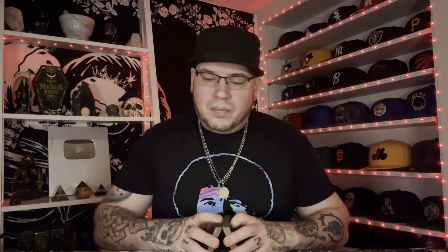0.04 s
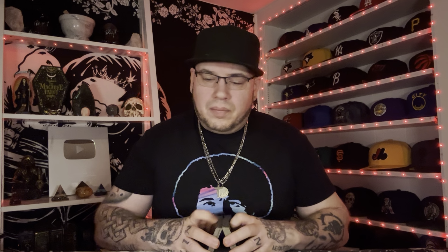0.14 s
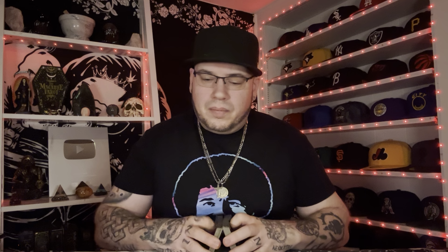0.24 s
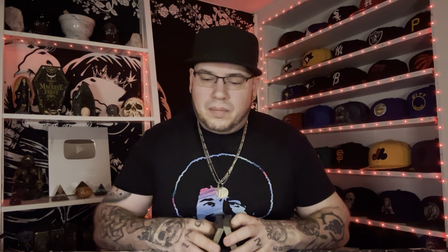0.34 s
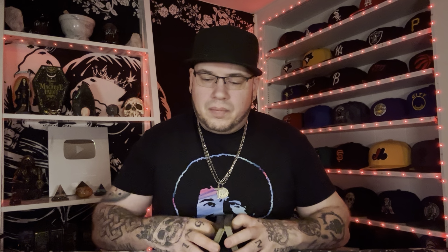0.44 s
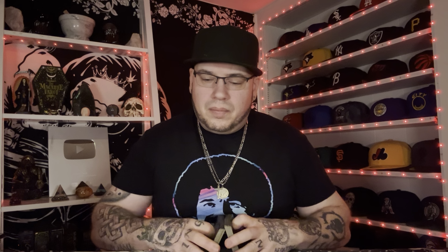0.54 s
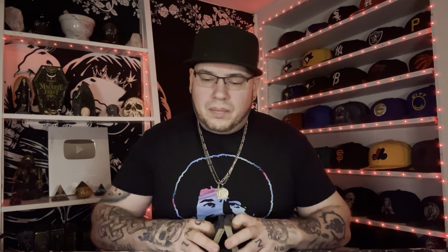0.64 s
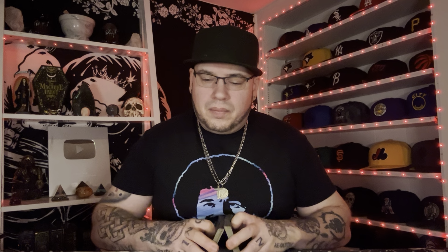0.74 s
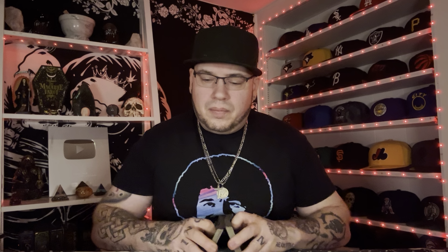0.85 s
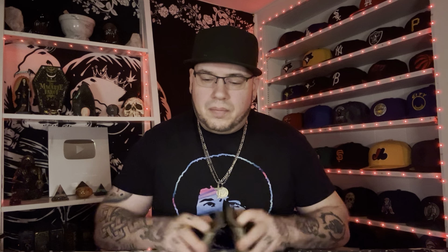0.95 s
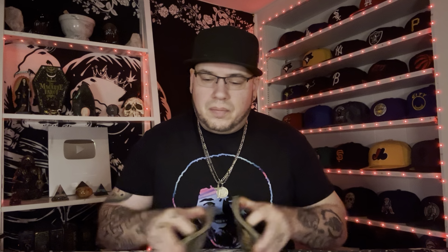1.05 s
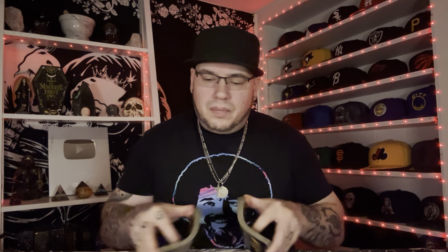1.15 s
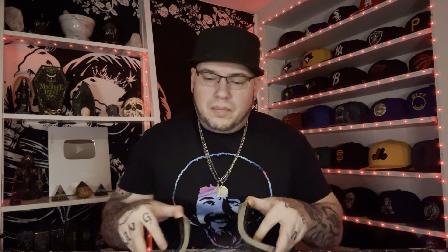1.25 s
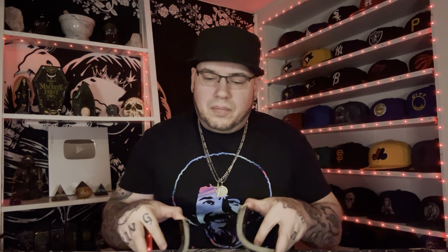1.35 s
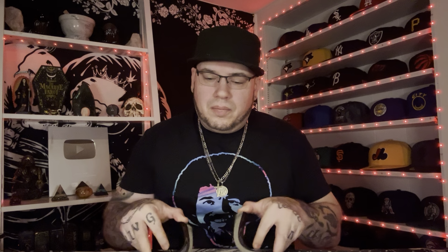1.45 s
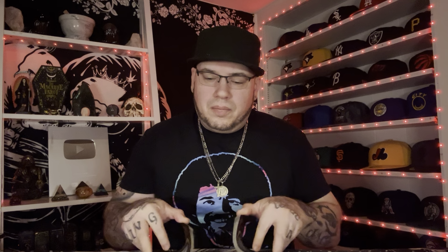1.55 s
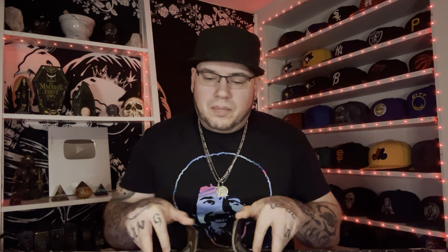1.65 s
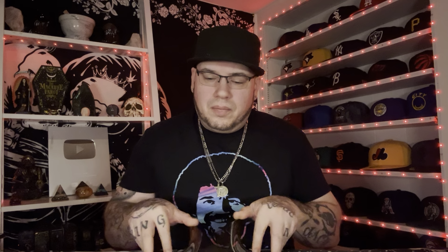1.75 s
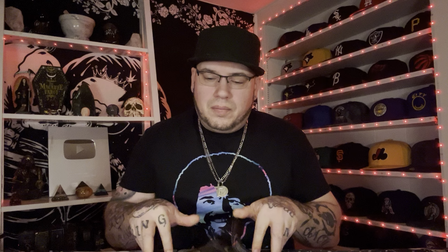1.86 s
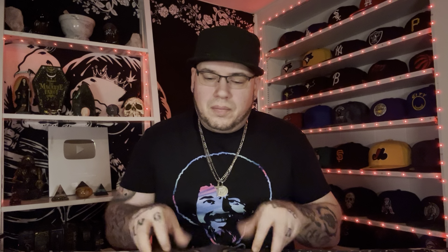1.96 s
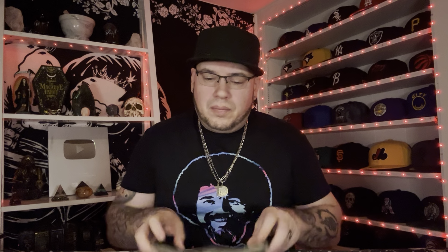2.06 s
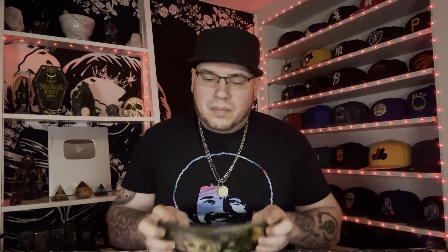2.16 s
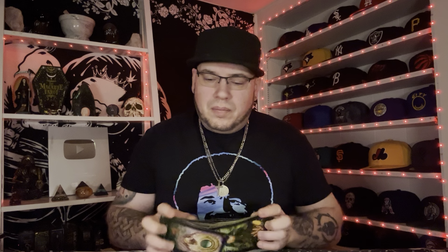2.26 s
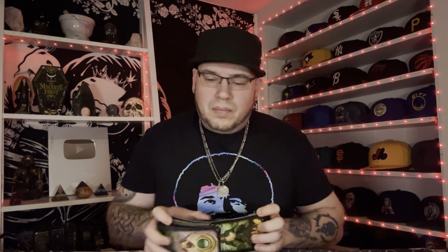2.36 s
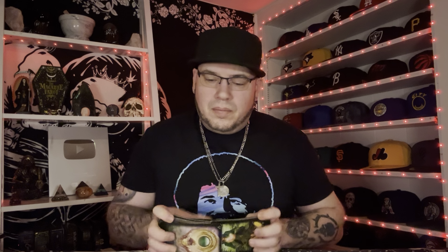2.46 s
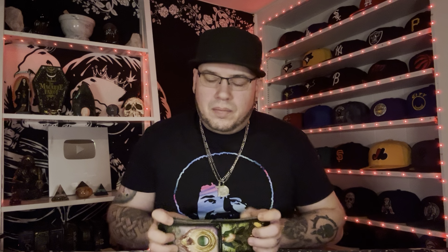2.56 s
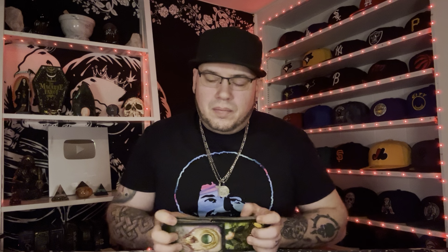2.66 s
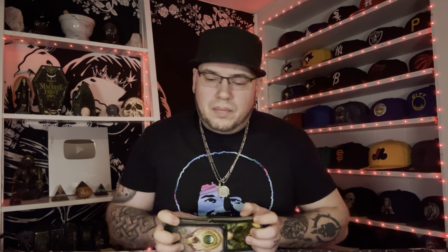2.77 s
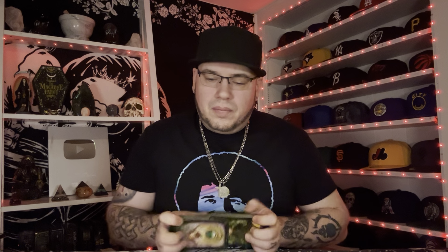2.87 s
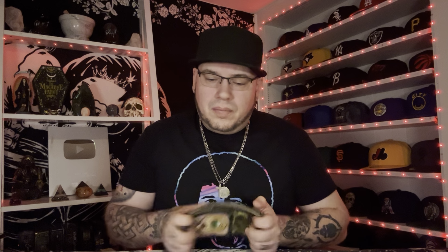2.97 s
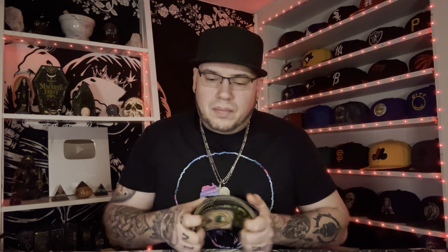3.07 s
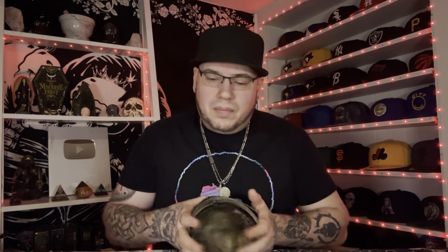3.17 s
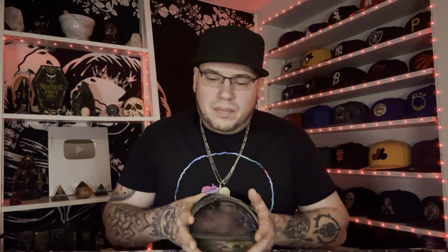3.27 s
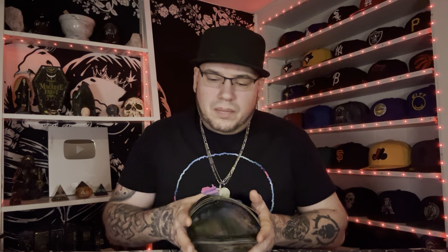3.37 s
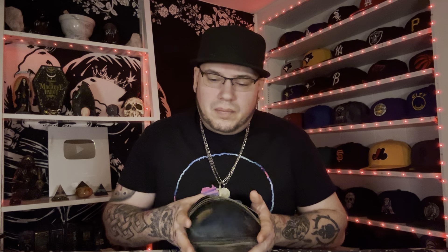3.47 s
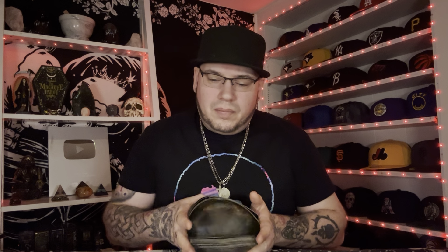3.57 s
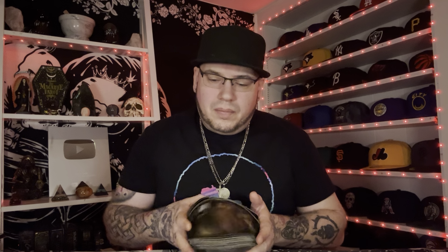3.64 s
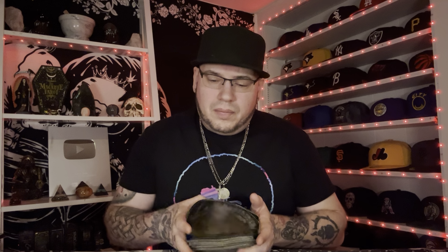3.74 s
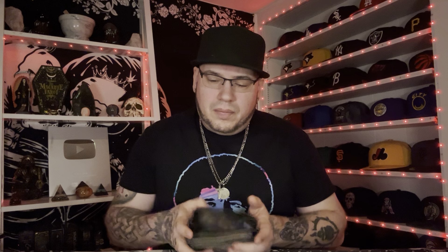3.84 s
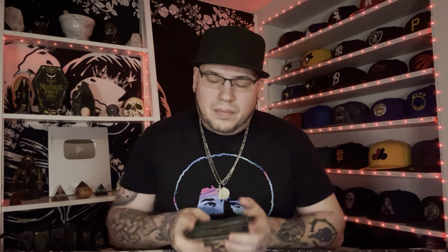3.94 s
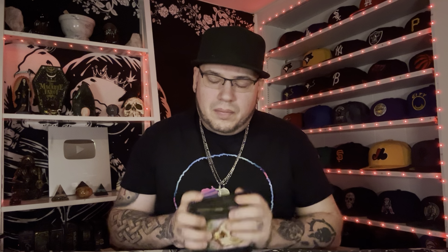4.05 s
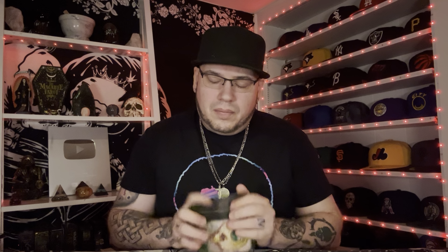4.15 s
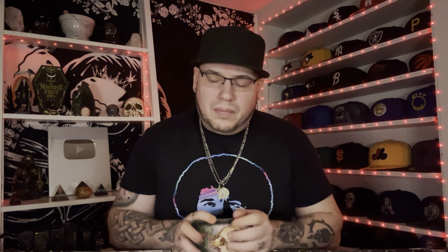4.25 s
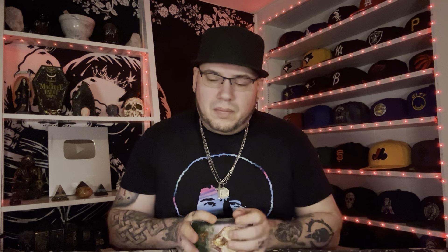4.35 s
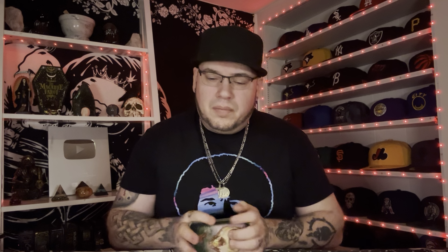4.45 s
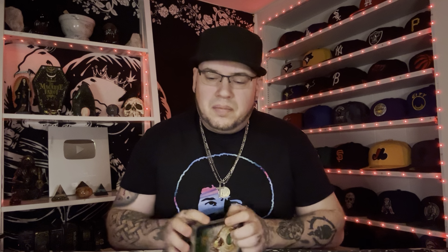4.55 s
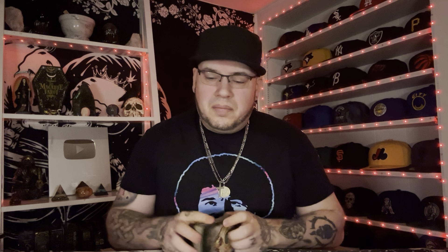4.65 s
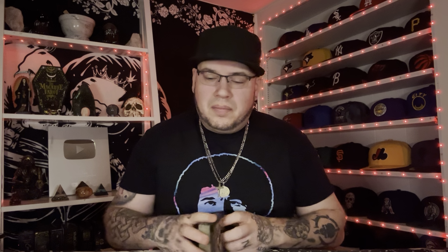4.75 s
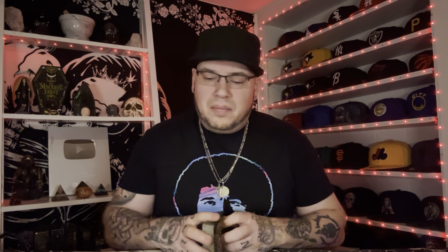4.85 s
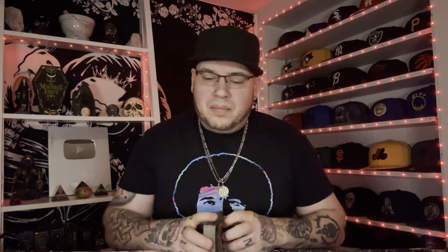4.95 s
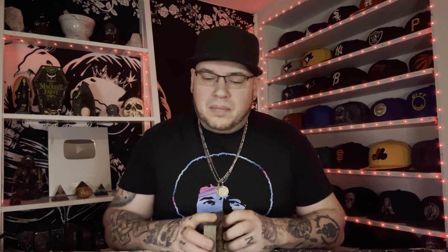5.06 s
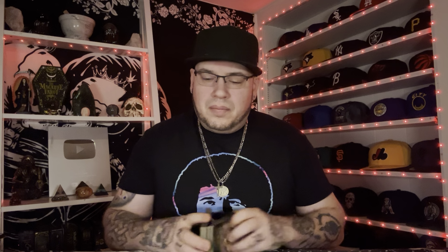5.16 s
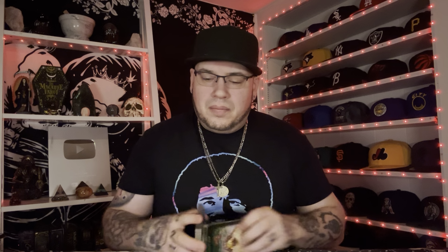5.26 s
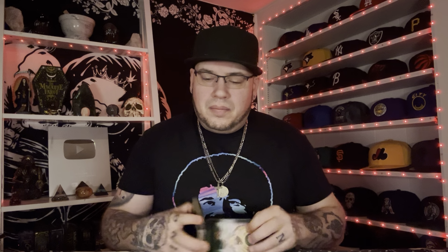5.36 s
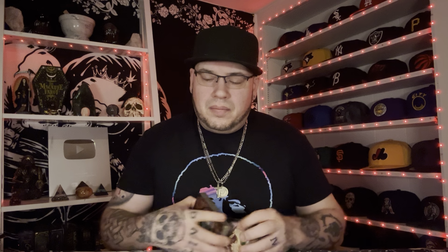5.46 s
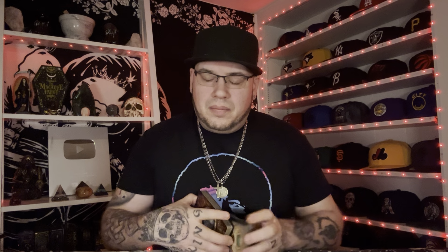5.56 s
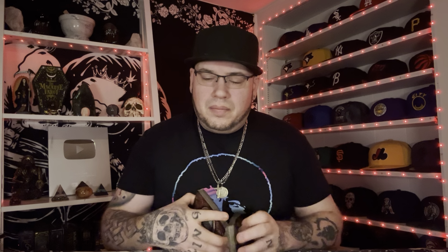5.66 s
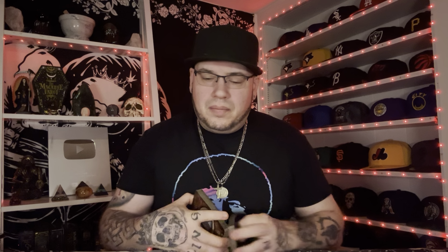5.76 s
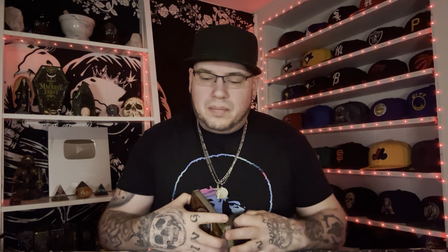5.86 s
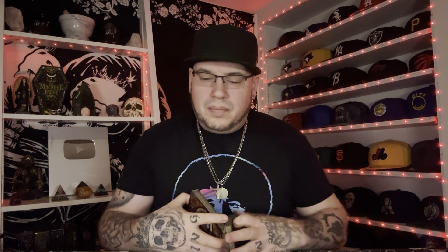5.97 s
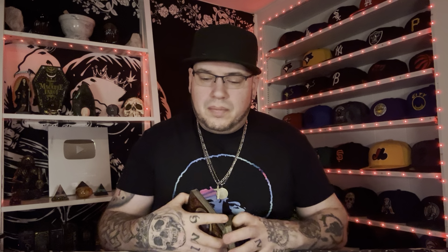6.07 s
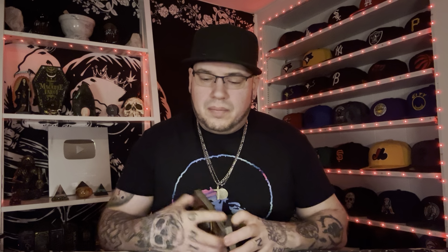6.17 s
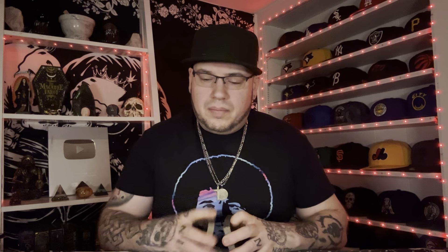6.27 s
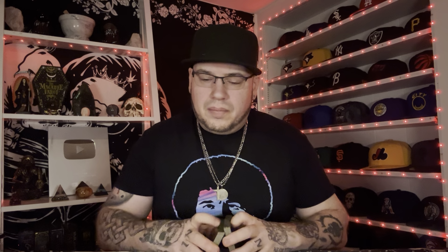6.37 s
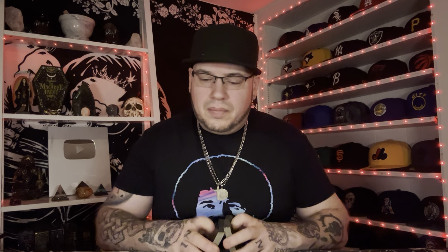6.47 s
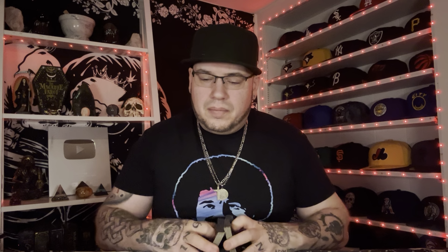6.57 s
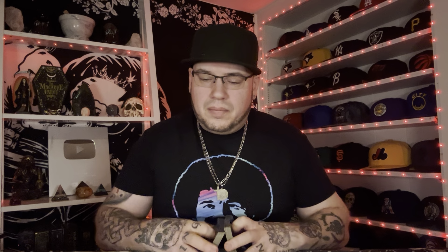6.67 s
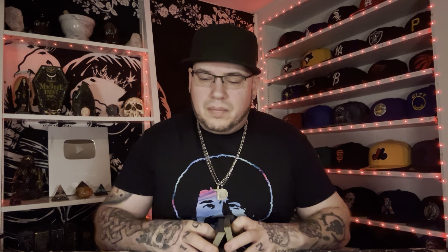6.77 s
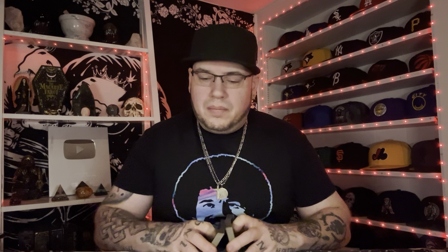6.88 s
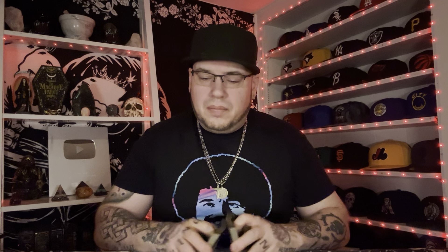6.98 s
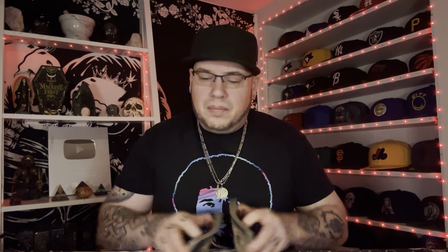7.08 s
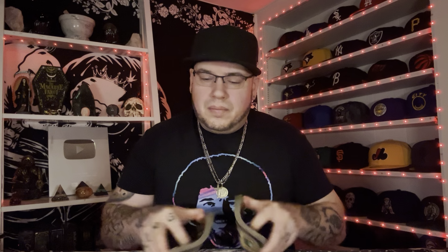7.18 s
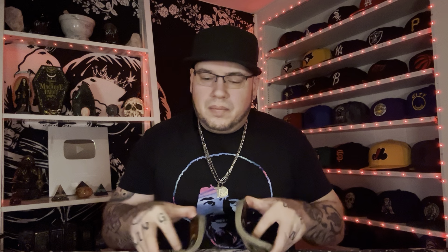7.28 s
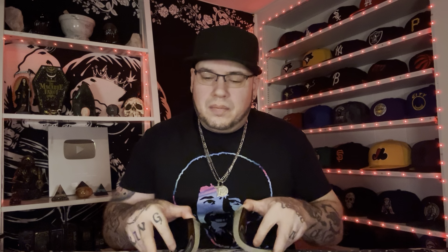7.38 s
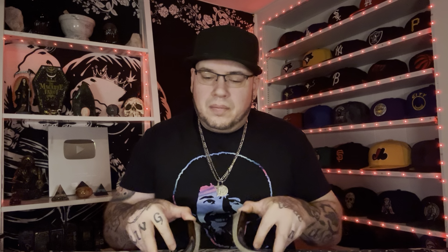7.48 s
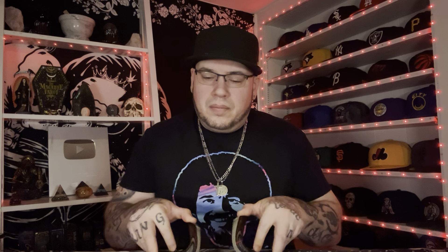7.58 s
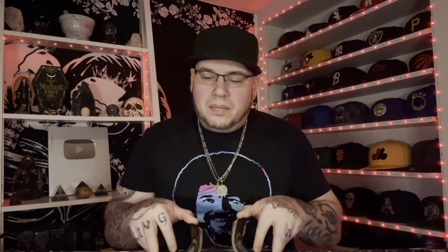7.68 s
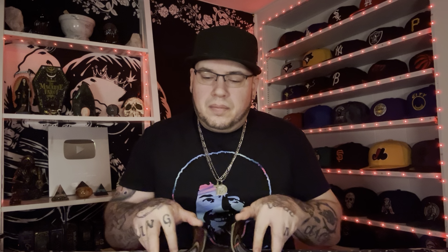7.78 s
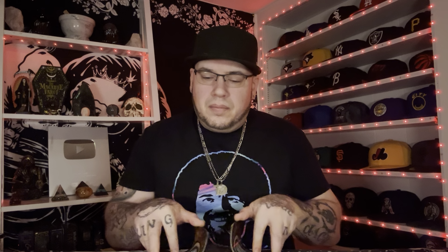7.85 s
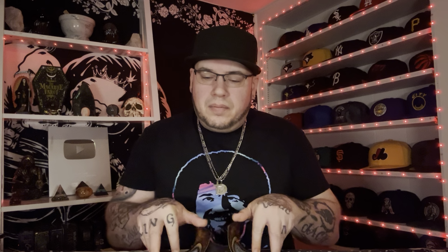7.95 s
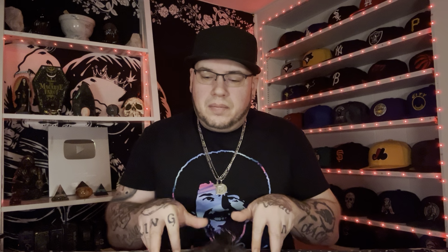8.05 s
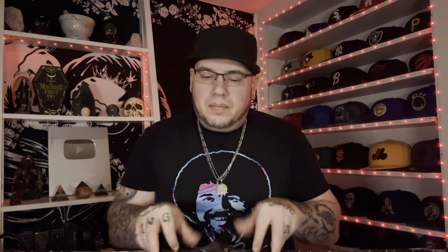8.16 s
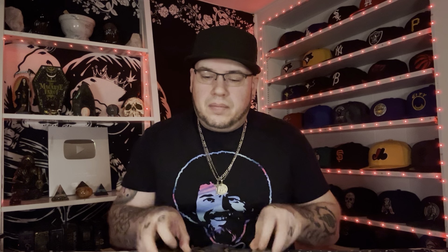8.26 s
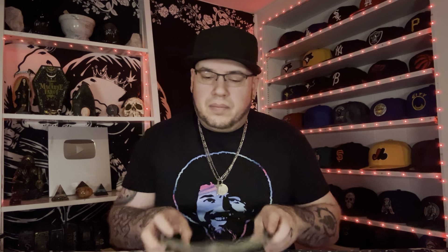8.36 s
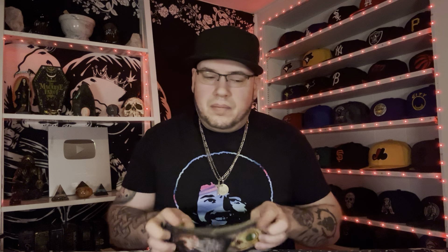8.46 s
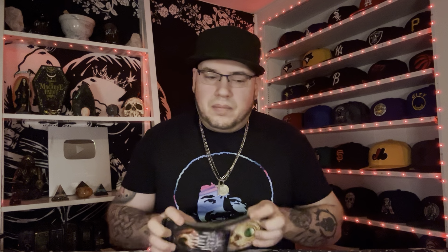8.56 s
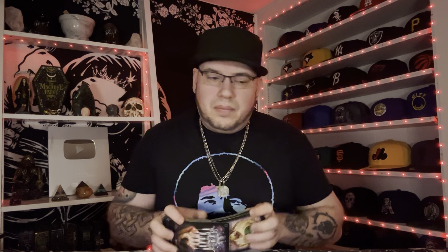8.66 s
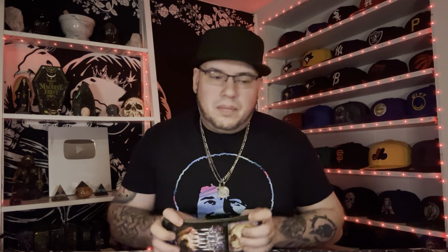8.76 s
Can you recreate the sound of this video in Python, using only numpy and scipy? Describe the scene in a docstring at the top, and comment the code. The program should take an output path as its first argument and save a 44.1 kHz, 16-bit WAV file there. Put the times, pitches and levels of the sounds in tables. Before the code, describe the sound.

Two brisk, snappy riffle shuffles of a big card deck, with a lighter cascade, squaring knocks and faint finger rubbing in a quiet humming room.

```python
"""A deck of large cards on a table: fingers rustle over it, then a first riffle shuffle, a bridge cascade,
knocks as the deck is squared up, more handling, and a second riffle.
Each clear card ticks at its edge, slaps the pile and pops the air pocket below, all from shaped noise and
short swings; bent pulses make the sharpest cracks, and many small puffs of noise make the flaps between.
Throughout, a small furnished room with a mains hum is heard by two microphone ports close together."""
import sys
import numpy as np
from scipy import signal
from scipy.fft import rfft, irfft, next_fast_len
from scipy.io import wavfile
from scipy.ndimage import uniform_filter1d

SR = 44100
rng = np.random.default_rng(int(sys.argv[2]) if len(sys.argv) > 2 else 0)


def wav_record(signal):
    """Record a signal, one row per channel, as 16-bit PCM in the file named by sys.argv[1]."""
    frames = np.transpose(np.atleast_2d(signal))
    bounded = np.clip(frames, -1, 1)
    # unit amplitude maps onto the largest positive 16-bit level
    quanta = np.round(bounded * 32767).astype(np.int16)
    wavfile.write(sys.argv[1], SR, quanta)


N = 388962   # length [samples]

# the clear cards: (time [s], edge tick level [dB], slap level [dB], air pop level [dB], pop pitch [Hz])
CARD_FALLS = [(1.1876, -23, -12.5, -15, 800), (1.251, -20.5, -32, -28, 596), (1.2584, -45, -18, -14, 445),
              (1.263, -41.5, -10, -11, 1040), (1.2678, -32, -13, -33, 1200), (1.2819, -51, -20, -20, 850),
              (1.3004, -26, -35, -17, 940), (1.312, -36, -31, -21.5, 810), (1.37, -16, -10, -22, 900),
              (1.393, -41, -23, -20, 900), (1.4047, -42, -20, -17.5, 624), (1.4265, -16, -10, -20.5, 1090),
              (1.4539, -18, -7.5, -15, 1190), (1.4755, -23.5, -13.5, -39, 1270),
              (1.498, -18.5, -11, -24, 800), (1.51, -38.5, -23, -19, 565), (1.5238, -13, -6, -14.5, 830),
              (1.537, -19.5, -11.5, -27.5, 307), (1.5725, -34, -18, -21, 720),
              (1.5878, -14.5, -6.5, -17, 476), (1.609, -8, -1.5, -15.5, 580),
              (1.625, -38.5, -9.5, -18, 766), (1.6445, -13, -9, -16, 965), (1.652, -8.5, -28, -37, 800),
              (1.6765, -31.5, -10, -18, 570), (1.7113, -9, -16, -36, 1040), (1.7223, -38.5, -9, -14, 900),
              (1.762, -26, -13.5, -38, 1170), (1.785, -13.5, -19, -30, 790), (1.788, -11, -6.5, -14, 574),
              (1.8145, -47, -25, -39, 770), (1.829, -11, -4, -23, 990), (1.8729, -24, -22, -21.5, 580),
              (3.0955, -31, -31, -31, 615), (3.1617, -26, -48, -53, 1230), (3.175, -29, -33, -25, 715),
              (3.2, -23, -45, -26, 1240), (3.2274, -18, -30, -16, 574), (3.2624, -40, -28.5, -27, 1000),
              (3.276, -24.5, -35, -54, 447), (3.324, -22, -49, -27, 720), (3.34, -27.5, -51, -32, 700),
              (3.375, -31, -30, -30, 596), (3.3903, -21.5, -49, -40, 700), (3.42, -15.5, -48, -33, 1070),
              (3.4539, -21, -22, -26, 380), (3.478, -15, -32, -9.5, 940), (3.5138, -13.5, -8, -4.5, 746),
              (3.5256, -15.5, -20, -16, 573), (3.5561, -22, -18, -17.5, 540), (3.5726, -23, -21, -21, 596),
              (3.599, -29, -37, -30, 900), (3.619, -26, -30, -34, 900), (3.6345, -37, -19, -26, 1970),
              (3.672, -23.5, -25, -36, 1245), (3.716, -25, -20.5, -48, 900), (3.682, -28.5, -40, -42, 900),
              (3.738, -19.5, -21, -23, 960), (3.785, -23, -17, -23.5, 507), (3.8004, -20.5, -37, -42, 800),
              (3.81, -23, -40, -30, 1270), (3.8492, -40.5, -35, -28, 900), (3.861, -27, -15, -30, 640),
              (3.872, -40, -19, -36, 700), (3.946, -52, -40, -27, 1700), (7.225, -39.5, -17, -19.5, 763),
              (7.2748, -42.5, -34, -28, 790), (7.28, -51, -40, -20, 533), (7.2969, -51, -23.5, -24, 610),
              (7.3181, -16, -16, -18.5, 420), (7.348, -31.5, -20.5, -19.5, 900),
              (7.3508, -11.5, -5, -28.5, 410), (7.369, -36, -25.5, -12, 600),
              (7.3795, -19, -21.5, -34.5, 597), (7.4271, -8.5, -14, -37, 1300),
              (7.4425, -22.5, -27, -28.5, 397), (7.4694, -13.5, -19, -19, 636),
              (7.4885, -15.5, -17, -45, 558), (7.501, -6.5, -6.5, -15.5, 690), (7.507, -9.5, -17, -31, 900),
              (7.5445, -13.5, -19.5, -25, 1110), (7.5581, -14.5, -25, -21.5, 1130),
              (7.579, -9.5, -21, -20.5, 696), (7.612, -31, -18.5, -23, 900), (7.6167, -8, -5, -24.5, 770),
              (7.623, -17, -15, -34, 900), (7.676, -45, -22, -21, 597), (7.681, -17, -20, -15, 720),
              (7.7131, -37.5, -17.5, -25.5, 308), (7.7235, -17, 0.5, -15.5, 1120),
              (7.7295, -10.5, -21, -31.5, 815), (7.748, -11.5, -9.5, -18.5, 900),
              (7.7754, -40, -43, -58, 800), (7.7977, -16, -13.5, -26.5, 900),
              (7.8006, -12.5, -1.5, -9, 643), (7.813, -18, -37, -43.5, 567),
              (7.85, -40.5, -29.5, -18.5, 765), (7.86, -14, -10.5, -30.5, 1010),
              (7.8802, -31, -25, -17, 520), (7.893, -23.5, -14.5, -30.5, 930),
              (7.896, -17, -9.5, -20.5, 900), (7.924, -17.5, -10.5, -21, 654),
              (7.9455, -17.5, -13.5, -20, 675), (7.949, -19, -17, -26, 900), (7.9555, -10, -32, -43, 700),
              (8.007, -17, -13, -12.5, 736), (8.0275, -20.5, -20.5, -41.5, 700), (8.0369, -6, -8, -41, 880),
              (8.0581, -9.5, -4, -15, 860)]
# tone colour of card edges: (frequency [Hz], level [dB])
EDGE_COLOUR = [(2060, -9), (3500, -5), (5860, -1), (8890, -4), (10100, -7), (11700, -8), (14100, -9.5),
               (15600, -16.5), (16200, -25.5), (17000, -51)]


def from_db(db):
    """Turn decibels into gain."""
    return 10 ** (np.asarray(db) / 20)


def rms_one(x):
    """Scale to an rms (average strength) of 1."""
    return x / np.sqrt(np.mean(x ** 2) + 1e-20)


def in_time(stretches):
    """Turn the level columns of several stretches into curves, silent between them."""
    rows = []
    for stretch in stretches:
        first, last = stretch[0], stretch[-1]
        silence = [-110] * len(first[1:])
        rows += [(first[0] - .03, *silence), *stretch, (last[0] + .03, *silence)]
    s, *columns = np.transpose(rows)
    return [np.interp(np.arange(N) / SR, s, column) for column in columns]


def at_hz(points, hz):
    """Read a table between its points on a log-frequency axis."""
    points = np.array(points)
    return np.interp(np.log(hz + 1), np.log(points[:, 0] + 1), points[:, 1])


def coloured(x, spectrum):
    """Give a sound the tone colour of a table; the minimum-phase filter has unit power and no pre-echo."""
    log_gain = np.log(from_db(at_hz(spectrum, np.linspace(0, SR / 2, 1025))))
    cepstrum = irfft(log_gain)
    # folding the cepstrum forward puts the energy as early as possible
    cepstrum[1:1024] *= 2
    cepstrum[1025:] = 0
    pulse = irfft(np.exp(rfft(cepstrum)))
    pulse = pulse / np.linalg.norm(pulse)
    return signal.oaconvolve(x, pulse[None], axes=-1)[:, :N]


def resonance(x, hz, width_hz):
    """Let a sound ring at one pitch: a two-pole peak with gain 1 on top."""
    r = np.exp(-np.pi * width_hz / SR)
    top = (1 - r * r) / 2
    return signal.lfilter([top, 0, -top], [1, -2 * r * np.cos(2 * np.pi * hz / SR), r * r], x + 1e-18)


def drift(rate):
    """Wander slowly and randomly around 0 with a spread of 1, faster for a higher rate."""
    r = np.exp(-80 * np.pi * rate / SR)   # computed at every 40th sample
    slow = signal.lfilter([1], [1, -2 * r, r * r], rng.standard_normal(N // 40 + 2002))[2000:]
    return np.interp(np.arange(N) / 40, np.arange(len(slow)), rms_one(slow))


def noise(alike):
    """Make two channels of white noise that share a part: 0 is none, 1 is all."""
    mid, side = rng.standard_normal((2, N))
    alike = np.clip(alike, 0, 1)
    return np.sqrt((1 + alike) / 2) * mid + np.sqrt((1 - alike) / 2) * side * [[1], [-1]]


def burst(envelope):
    """Make uneven, spiky noise of many small contacts, with the energy of its envelope."""
    spikes = from_db(5.3 * rng.standard_normal(len(envelope)))
    grit = envelope * rng.standard_normal(len(envelope)) * spikes
    return grit * np.linalg.norm(envelope) / np.linalg.norm(grit)


def grains(per_s, spread_db, ms, alike):
    """Scatter random contacts over the deck, each a short puff of noise that dies away; rms 1."""
    sizes = from_db(spread_db * np.minimum(rng.exponential(1, N), 4))
    contacts = sizes * (rng.random(N) < per_s / SR)
    r = np.exp(-1000 / (ms * SR))
    return rms_one(signal.lfilter([1], [1, -r], contacts) * noise(alike))


def strokes_db(rows, rise, fall):
    """Follow the loudest stroke (start [s], length [s], level [dB]); rise and fall are in dB per second."""
    t = np.arange(0, N + 64, 64) / SR
    strokes = []
    for s, length, db in rows:
        before, after = np.maximum(s - t, 0), np.maximum(t - s - length, 0)
        strokes.append(db - rise * before - fall * after)
    level_db = np.maximum(np.max(strokes, axis=0), -110)
    return np.interp(np.arange(N) / SR, t, level_db)


def room_air():
    """The air of the room: steady noise, strongest in the bass, whose level wavers a little."""
    # tone colour of the room's air: (frequency [Hz], level [dB])
    air_colour = [(76, -24), (130, -10.5), (149, -12.5), (178, -16.5), (243, -19.5), (339, -23), (446, -27),
                  (728, -33.5), (1390, -34.5), (5260, -63.5), (9650, -56), (12400, -60), (14000, -88.5)]
    return from_db(-56 + 1.0 * drift(7.3)) * coloured(noise(0.33), air_colour)


def hum():
    """Twice and four times the mains frequency and some faint tones above, all wavering a little."""
    # steady tones of the hum: (frequency [Hz], level [dB])
    hum_tones = [(120, -41.5), (240, -66.5), (451, -74.5), (580, -77), (797, -79.5), (845, -78)]
    t = np.arange(N) / SR
    total = 0
    for hz, db in hum_tones:
        level = from_db(db + 0.41 * drift(11.0)) * np.sqrt(2)   # rms to peak
        wobble = 0.13 * np.sqrt(hz / 120) * drift(0.83)
        total = total + level * np.sin(2 * np.pi * hz * t + wobble)
    return total * from_db([[1.5], [-1.5]])   # stronger on the left


def table_top():
    """Low noise rings in the bending mode of the table top as the deck or a forearm pushes it."""
    # pushes on the table top: (time [s], level [dB])
    pushes = [(1.27, -39), (1.54, -38.5), (1.68, -36), (1.8, -32), (1.88, -30.5), (2.27, -52), (2.39, -49),
              (2.81, -57.5), (3.21, -54), (3.56, -55), (3.89, -51), (4.238, -45), (5.32, -55.5),
              (6.31, -47), (7.249, -47), (7.51, -40), (7.7, -42), (7.91, -34), (8.1, -41), (8.81, -62)]
    rise_db_per_s, fall_db_per_s = 96.5, 168.5
    rest_db, wander_db = -56.5, 1   # it never quite rests
    pushed_db = strokes_db([(s, 0, db) for s, db in pushes], rise_db_per_s, fall_db_per_s)
    resting_db = rest_db + wander_db * drift(1.1)
    shake = resonance(noise(1.0), 64, 34)
    shake = resonance(resonance(shake, 70, 50), 50, 89)
    return (from_db(pushed_db) + from_db(resting_db)) * rms_one(shake)


def room(x):
    """Echo a sound with a noise tail that dies band by band; the sides are most alike in the bass."""
    # how the room answers: (frequency [Hz], time to fall by 60 dB [s], level [dB])
    echo_bands = [(200, 0.16, 5.5), (440, 0.22, -2.5), (900, 0.23, -5.5), (2100, 0.2, 2), (5300, 0.26, -9),
                  (11900, 0.14, -2.5)]
    hz, t60, db = np.transpose(echo_bands)
    t = np.arange(SR // 2) / SR
    tail = 0
    for low in 100 * 2. ** np.arange(8):   # octave bands
        band = signal.butter(2, [low, min(2 * low, .45 * SR)], "band", fs=SR, output="sos")
        shared, own = rng.standard_normal(len(t)), rng.standard_normal((2, len(t)))
        middle = 1.4 * low
        fade_db = at_hz(np.c_[hz, db], middle) - 60 * t / at_hz(np.c_[hz, t60], middle)
        tail = tail + signal.sosfilt(band, np.sqrt(300 / low) * shared + own) * from_db(fade_db)
    tail = tail * (1 - np.exp(-t / 0.00095))   # soft start
    tail = tail / np.linalg.norm(tail[0])
    return signal.oaconvolve(x * np.ones((2, 1)), tail, axes=1)[:, :N]


def reflections(deck):
    """Each spot on the table has its own path to the walls; the sound comes from spots in random turn."""
    places, place_s = 3, 0.04   # number of spots, length of a turn [s]
    turns = rng.integers(0, places, int(N / SR / place_s) + 1)
    spot = turns[(np.arange(N) / SR / place_s).astype(int)]
    total = 0
    for k in range(places):
        share = uniform_filter1d(1. * (spot == k), size=64).clip(0)   # short crossfade
        total = total + room(deck * np.sqrt(share))
    return total


def handling():
    """Skin friction as fingers slide over the deck: a fine hiss, and a grainier rub that the deck carries."""
    # slides of the fingers: (start [s], length [s], hiss level [dB], rub level [dB])
    slides = [(0.0, 0.0045, -66.5, -60.5), (0.27, 0.19, -73.5, -67.5), (0.548, 0.32, -82, -69.5),
              (0.913, 0.048, -57, -56), (1.082, 0.066, -50.5, -57), (1.995, 0.055, -63.5, -59),
              (2.119, 0.071, -59.5, -60), (2.3, 0.15, -63.5, -61), (2.533, 0.045, -55.5, -53),
              (2.61, 0.14, -64.5, -67), (2.92, 0.54, -55.5, -54.5), (3.94, 0.044, -52, -51.5),
              (4.136, 0.13, -55.5, -53.5), (4.307, 0.11, -64, -60), (4.449, 0.097, -54, -54.5),
              (4.608, 0.19, -59, -59.5), (4.83, 0.067, -65.5, -61.5), (4.907, 0.12, -61, -60),
              (5.07, 0.16, -68, -62), (5.188, 0.07, -57, -59.5), (5.268, 0.22, -54, -53.5),
              (5.469, 0.1, -58, -56.5), (5.761, 0.13, -62, -64.5), (5.953, 0.13, -64.5, -63.5),
              (6.163, 0.0099, -60, -61.5), (6.318, 0.012, -57.5, -60.5), (6.483, 0.033, -68.5, -67),
              (6.546, 0.11, -70.5, -64), (6.82, 0.1, -75.5, -65), (7.004, 0.21, -56, -56.5),
              (8.142, 0.12, -66, -60), (8.359, 0.044, -66, -60.5), (8.562, 0.078, -66, -64.5),
              (8.793, 0.092, -50, -49.5)]
    # tone colour of skin hiss: (frequency [Hz], level [dB])
    skin_colour = [(1760, -39.5), (3000, -11), (9720, -8), (12900, -14.5), (13400, -21.5), (13700, -54),
                   (15100, -23.5), (15900, -14), (17000, -61)]
    # tone colour of the rub carried by the deck: (frequency [Hz], level [dB])
    rub_colour = [(180, -49.5), (300, -12), (575, -7), (900, -8), (1300, -5), (1700, -7), (2200, -6),
                  (2600, -8.5), (3000, -13.5), (5200, -20.5), (8800, -120)]
    # rise and fall [dB per s]; the deck carries the rub longer
    hiss_db = strokes_db([(s, length, db) for s, length, db, _ in slides], 324.5, 291)
    rub_db = strokes_db([(s, length, db) for s, length, _, db in slides], 151, 128.5)
    hiss = from_db(hiss_db + 0.71 * drift(25)) * coloured(noise(0.47), skin_colour)
    scrape = noise(0.093) + 0.45 * grains(140, spread_db=3.0, ms=5.0, alike=0.6)
    rub = from_db(rub_db + 1.3 * drift(18)) * coloured(scrape, rub_colour)
    return hiss + rub


def taps():
    """The deck knocks on the table or in the hands: a few cycles of ringing, papery grit and a low thud."""
    # knocks of the deck: (time [s], level [dB], pitch [Hz], swell time [ms], thud level [dB])
    knocks = [(0.93, -49, 1470, 1.8, -55), (0.96, -49, 1290, 2.1, -60), (1.159, -42, 585, 2.2, -48),
              (2.379, -51, 332, 2, -54), (2.541, -39, 1480, 0.68, -59), (4.122, -47, 1800, 0.97, -34),
              (4.1537, -40, 620, 4, -26), (4.1695, -35, 1270, 1.1, -27), (4.173, -24, 675, 1.3, -28.5),
              (4.1808, -29, 453, 4.1, -26), (4.187, -32, 1220, 1, -39), (4.199, -39, 1010, 4.5, -36),
              (4.2275, -35, 1230, 1.1, -32), (4.2308, -19.5, 1006, 1.8, -38), (4.241, -34, 900, 2, -27),
              (4.249, -53, 1150, 2.2, -29), (4.261, -43, 1010, 1.9, -43), (4.515, -46, 765, 3.1, -48),
              (4.531, -56, 1200, 3, -55), (4.547, -56, 900, 2.7, -58), (5.285, -46, 1136, 3.1, -63),
              (5.389, -48, 810, 1.5, -58), (5.424, -53, 1135, 4, -60), (5.44, -51, 585, 4.8, -55),
              (5.8218, -47, 900, 1, -44), (6.289, -42.5, 1190, 0.97, -38.5), (6.303, -51, 2040, 2.5, -69),
              (6.293, -47, 800, 2.2, -47.5), (6.325, -45.5, 802, 1.1, -52), (6.4828, -47.5, 1254, 2.2, -53),
              (8.7772, -44, 1240, 2.5, -47)]
    grit_share, thud_hz = 0.7, 280   # the thud is the hand's weight
    top = 1.75   # dull above this multiple of the pitch
    out, t = np.zeros((1, N + 2000)), np.arange(2000) / SR
    for s, db, hz, ms, thud_db in knocks:
        swell = 1000 * t / ms * np.exp(1 - 1000 * t / ms)
        grit = resonance(resonance(burst(swell), hz, 1.5 * hz), 0.85 * hz, 2 * hz)
        grit *= grit_share * np.linalg.norm(swell) / np.linalg.norm(grit)
        thud = from_db(thud_db) * np.sin(2 * np.pi * thud_hz * t) * np.exp(-t / 0.0022)
        knock = from_db(db) * (swell * np.sin(2 * np.pi * hz * t) + grit) + thud
        dulling = signal.butter(4, top * hz, fs=SR, output="sos")
        start = round(s * SR)
        out[0, start:start + 2000] += signal.sosfilt(dulling, knock)
    return out[:, :N]


def flutter():
    """Cards brush and flap without a clear slap: dull, bright and papery puffs of noise."""
    # small flaps, one list per riffle or cascade: (time [s], level [dB], level of the papery middle [dB])
    flaps = [
        [(1.165, -53, -54.5), (1.181, -32.5, -44.5), (1.2, -49.5, -46), (1.24, -49.5, -54.5),
         (1.29, -33.5, -37.5), (1.34, -47.5, -53.5), (1.41, -35.5, -41.5), (1.63, -37.5, -38.5),
         (1.81, -31.5, -37), (1.92, -57, -53)],
        [(3.06, -71, -83), (3.16, -47.5, -49.5), (3.25, -34.5, -50), (3.31, -47, -62), (3.41, -39.5, -40.5),
         (3.51, -32, -39.5), (3.64, -42, -40.5), (3.7, -42, -44.5), (3.79, -37.5, -42), (3.88, -37.5, -38.5),
         (3.95, -78, -58)],
        [(7.21, -40.5, -60), (7.31, -55, -51), (7.37, -25, -36), (7.41, -57, -54), (7.44, -37, -45),
         (7.66, -36.5, -41.5), (7.8, -42, -48.5), (8.05, -38, -39), (8.11, -55, -51)],
    ]
    # tone colour of the dull part: (frequency [Hz], level [dB])
    body_colour = [(90, -31.5), (180, -4.5), (400, -0.5), (800, -1.5), (1500, -7), (2300, -11.5),
                   (3200, -13), (5000, -17.5), (7000, -30.5)]
    # tone colour of the papery middle: (frequency [Hz], level [dB])
    papery_colour = [(600, -24), (1000, -5.5), (1400, 0.5), (1750, -2.5), (2300, -5), (2800, -10.5),
                     (4000, -30)]
    level_db, papery_db = in_time(flaps)
    dull = coloured(grains(220, spread_db=3.0, ms=2.4, alike=0.92), body_colour)
    bright = coloured(grains(300, spread_db=1.5, ms=2.2, alike=.8), EDGE_COLOUR)
    papery = coloured(grains(260, spread_db=3.0, ms=3.0, alike=.55), papery_colour)
    return from_db(level_db) * (dull + from_db(-1.5) * bright) + from_db(papery_db) * papery


def snaps():
    """A bent edge springs free or a face smacks flat: a brief swing sags in pitch under a lopsided bell."""
    # the sharpest cracks: (time [s], level [dB], pitch [Hz])
    cracks = [(1.1886, -12, 5450), (1.1914, -6.5, 945), (1.2505, -12.5, 10130), (1.2685, -8.5, 1767),
              (1.3026, -10, 1460), (1.372, -12, 8430), (1.3721, -11, 1355), (1.407, -20, 1470),
              (1.4274, -18, 4780), (1.428, -7.5, 1035), (1.4547, -21, 4250), (1.4782, -16, 7400),
              (1.4792, -8.5, 1276), (1.5243, -5.5, 1680), (1.5243, -10.5, 5390), (1.574, -10.5, 950),
              (1.5884, -13.5, 1606), (1.589, -17.5, 7000), (1.6101, -25, 7220), (1.61, -8, 1420),
              (1.6168, -6.5, 8770), (1.6461, -15.5, 8130), (1.6453, -9, 1154), (1.6533, -14, 9100),
              (1.7637, -17.5, 1390), (1.7865, -22.5, 1865), (1.788, -5, 4790), (1.83, -4.5, 1957),
              (1.835, -19, 6740), (3.2276, -10.5, 8670), (3.229, -12, 1350), (3.424, -15, 8700),
              (3.4239, -14.5, 1530), (3.4786, -9.5, 6270), (3.479, -1, 1230), (3.5144, -7, 7470),
              (3.5138, -7, 1160), (3.527, -23, 7100), (3.5568, -16.5, 7250), (3.558, -11.5, 1195),
              (3.618, -15.5, 5500), (3.671, -12, 5850), (3.7174, -9, 6170), (3.752, -29, 5400),
              (3.7404, -20, 7010), (3.7402, -18.5, 1630), (3.812, -15, 1260), (4.236, -22, 700),
              (7.2262, -18, 1500), (7.3171, -10.5, 5040), (7.3178, -7.5, 1400), (7.3524, -4.5, 4530),
              (7.352, -9, 1600), (7.3825, -10, 1300), (7.426, -5.5, 6800), (7.4723, -9.5, 8650),
              (7.4727, -16.5, 1240), (7.5007, -15, 8000), (7.503, -16.5, 1190), (7.545, -11.5, 7660),
              (7.559, -9, 9160), (7.5614, -6.5, 1310), (7.582, -12.5, 8860), (7.619, -2, 4710),
              (7.6193, -12, 1800), (7.6817, -14.5, 9270), (7.6833, -10, 1036), (7.728, -7.5, 1530),
              (7.8022, -20, 1375), (7.8523, -13, 960), (7.8619, -14, 8040), (7.8622, -20.5, 1460),
              (7.9, -10.5, 1210), (7.957, -19, 9540), (8.0102, -33.5, 920), (8.0385, -6, 3200),
              (8.0398, -23, 7960), (8.0589, -14, 7020), (8.0584, -21, 1720)]
    half_cycles, half_min_ms = 0.31, 0.31   # half length of a crack, and its least value
    sag_halves, tail = 3.0, 2.2   # pitch falls by e in so many half lengths; fall of the bell against its rise
    spread_us = 7   # largest time shift at each port, opposite on the two sides, from hand to hand
    out = np.zeros((2, N))
    for (s, db, hz), (turn, side) in zip(cracks, rng.uniform(-0.77, 1, (len(cracks), 2))):
        half = max(half_cycles / hz, half_min_ms / 1000)
        shift = side * spread_us / 1e6 * np.array([[1], [-1]])
        t = np.arange(-300, 300) / SR + shift
        bell = np.exp(-(t / (half * np.where(t > 0, tail, 1))) ** 2)
        sag = sag_halves * half
        swing = np.cos(2 * np.pi * hz * sag * (1 - np.exp(-t / sag)) + np.pi * turn)
        swing -= np.sum(bell * swing) / np.sum(bell)   # as much pull as push
        middle = round(s * SR)
        out[:, middle - 300:middle + 300] += from_db(db) * bell * swing
    return out


def ticks():
    """Each card edge gives a sharp click, then a weaker crackle as the card slides home."""
    rise_s, fall_s, crackle_share, crackle_s = 0.00033, 0.00073, 0.21, 0.009
    out, t = np.zeros((1, N + 2000)), np.arange(2000) / SR
    fall = np.exp(-t / fall_s) + crackle_share * np.exp(-t / crackle_s)
    shape = (1 - np.exp(-t / rise_s)) * fall
    for s, db, *_ in CARD_FALLS:
        start = round(s * SR)
        out[0, start:start + 2000] += from_db(db) * burst(shape)
    return coloured(out, EDGE_COLOUR)


def cards():
    """Each card lands with a rough slap on the pile and a few cycles of the squeezed air pocket."""
    # tone colour of the slap: (frequency [Hz], level [dB])
    slap_colour = [(530, -16.5), (900, -8.5), (1250, -12), (1600, -4), (2420, -2), (2800, -7), (5000, -5),
                   (6500, -30), (11000, -120)]
    landing_ms, landing_spread_db = 2.3, 2.0   # typical fall time of a slap, and how much it varies
    slap_rise = 1   # rise time as a share of the fall
    ring_middle_hz, ring_width_hz, ring_db, ring_spread = 2420, 100, -6, 0.053   # stiff cards ring briefly
    pop_cycles = 0.54   # how soon the air pocket stops swinging
    slap, pop = np.zeros((2, 1, N + 2000))
    t = np.arange(2000) / SR
    for s, _, db, pop_db, pop_hz in CARD_FALLS:
        start = round(s * SR)
        at = slice(start, start + 2000)
        ms = landing_ms * from_db(landing_spread_db * rng.standard_normal())
        fade = max(ms, .3) / 1000
        swell = np.exp(-t / fade) * (1 - np.exp(-t / (slap_rise * fade)))
        hit = burst(swell)
        ring_hz = ring_middle_hz * np.exp(ring_spread * rng.standard_normal())   # each a little off the others
        slap[0, at] += from_db(db) * (hit + from_db(ring_db) * resonance(hit, ring_hz, ring_width_hz))
        cycles = pop_hz * t
        swing = np.sin(2 * np.pi * cycles) * (cycles / pop_cycles) ** 2 * np.exp(-cycles / pop_cycles)
        puff = resonance(burst(swell), 0.8 * pop_hz, 1.6 * pop_hz)
        puff = resonance(puff, 1.5 * pop_hz, 2.4 * pop_hz)
        puff *= from_db(1.5) * np.linalg.norm(swell) / np.linalg.norm(puff)
        pop[0, at] += from_db(pop_db) * (1.15 * swing + puff)
    return pop[:, :N] + coloured(slap, slap_colour)


def scene():
    """Add up the deck with its reflections, the fingers, the table, the hum and the air of the room."""
    deck = cards() + ticks() + snaps() + taps() + flutter()
    near = deck + from_db(-7.5) * reflections(deck) + handling()
    near = near * from_db([[-.5], [.5]])   # a little stronger on the right
    return near + table_top() + hum() + room_air()


def record(dry):
    """The two ports shift the phase against each other; peaks are rounded, the top is cut."""
    # phase between the ports: (frequency [Hz], lead of the left side [radians])
    port_lead = [(0, 0), (1500, -.4), (3000, -1.3), (4800, -2.4), (6900, -2.1), (9100, -.4), (10200, .1),
                 (12700, 2.4), (13800, 3.1), (16000, 3.5)]
    cutoff_hz = 17100
    size = next_fast_len(N + 4096)
    lead = at_hz(port_lead, np.arange(size // 2 + 1) * SR / size)
    turned = rfft(dry, size) * np.exp(.5j * lead * [[1], [-1]])   # half the lead on each side
    ports = irfft(turned, size)[:, :N]
    rounded = .8 * np.tanh(ports / .8)
    return signal.sosfilt(signal.cheby2(12, 70, cutoff_hz, fs=SR, output="sos"), rounded)


dry = scene()
out = record(dry)
wav_record(out)
```